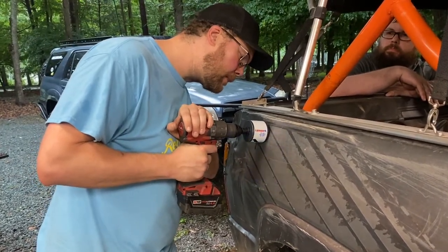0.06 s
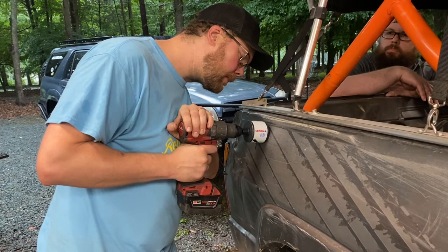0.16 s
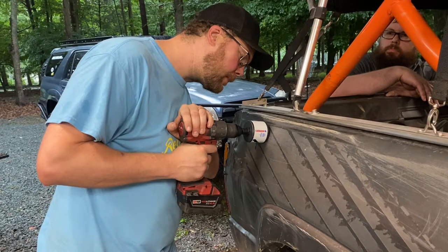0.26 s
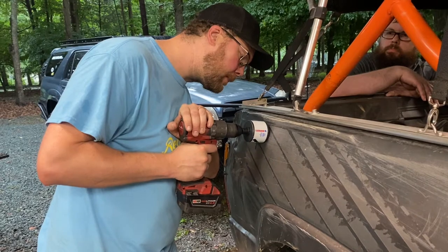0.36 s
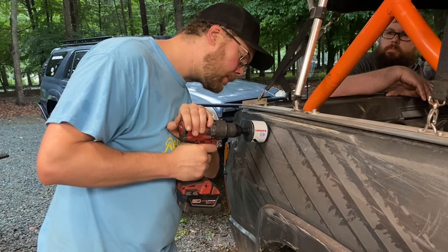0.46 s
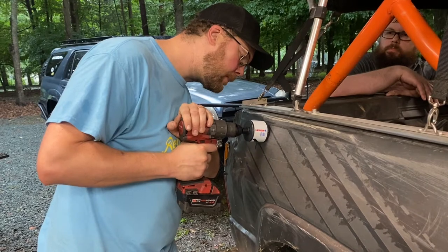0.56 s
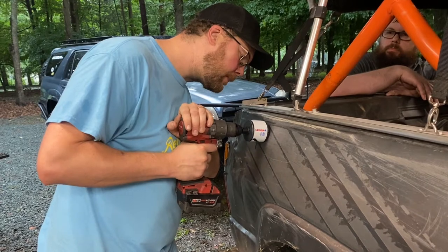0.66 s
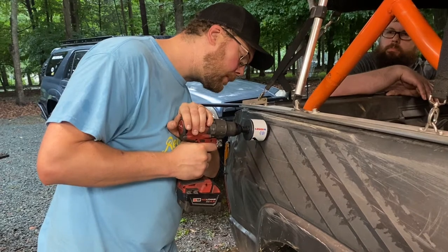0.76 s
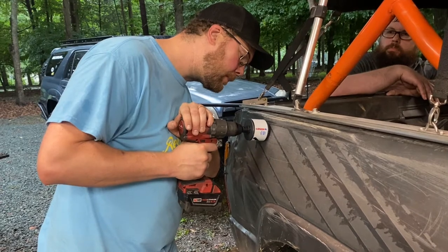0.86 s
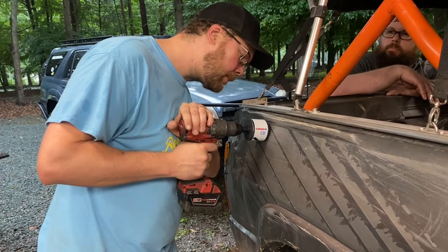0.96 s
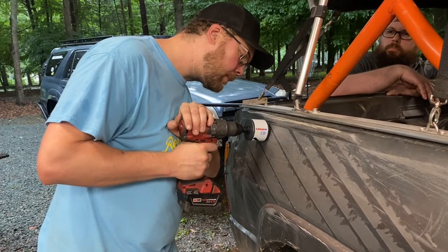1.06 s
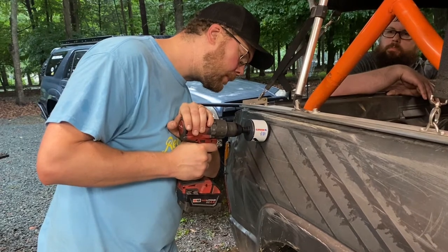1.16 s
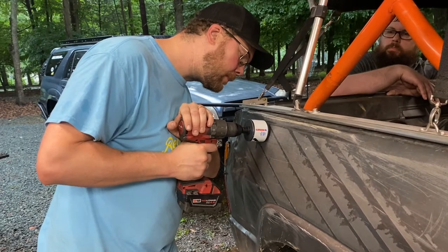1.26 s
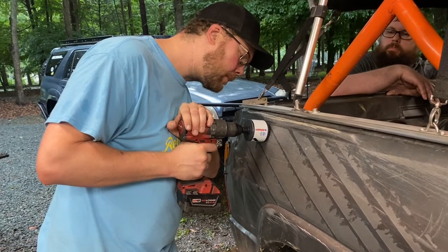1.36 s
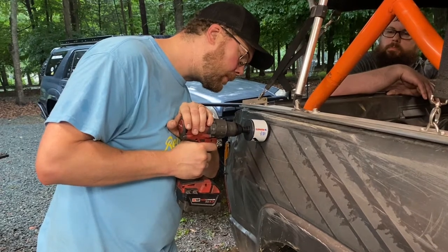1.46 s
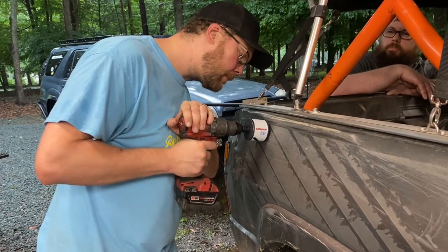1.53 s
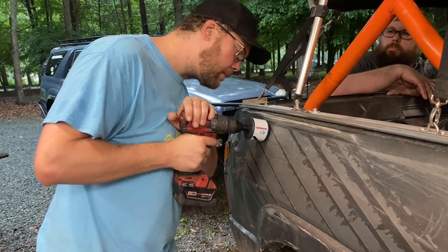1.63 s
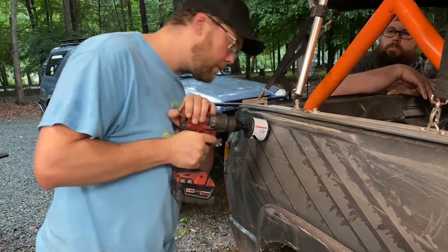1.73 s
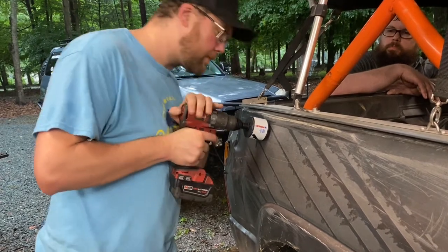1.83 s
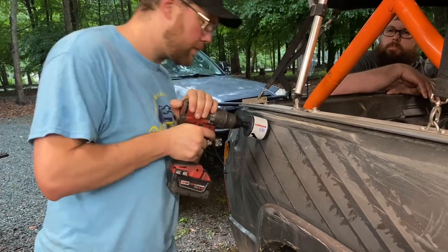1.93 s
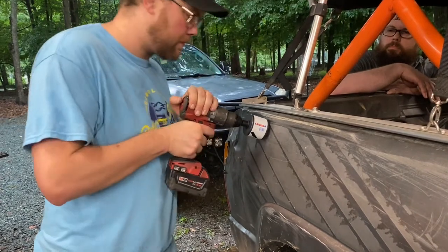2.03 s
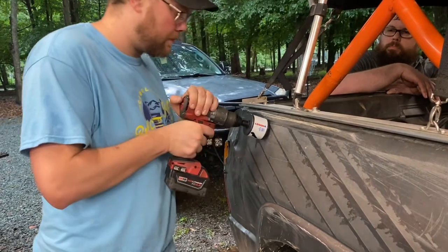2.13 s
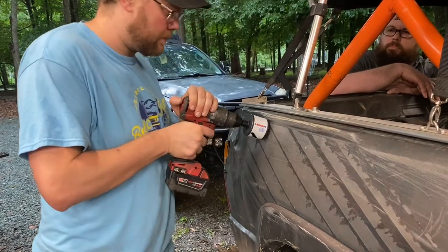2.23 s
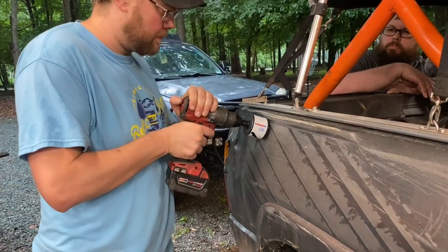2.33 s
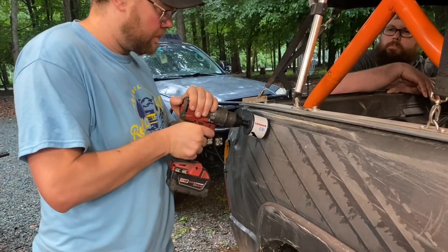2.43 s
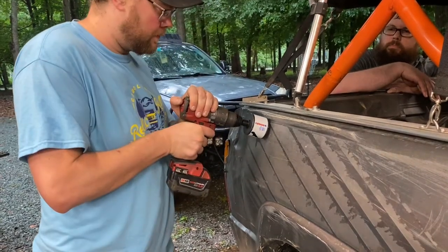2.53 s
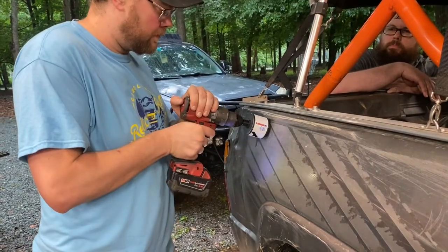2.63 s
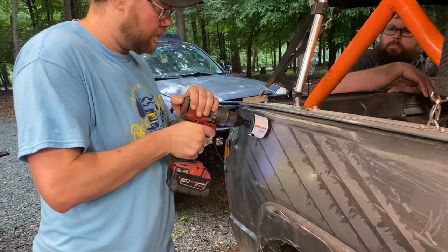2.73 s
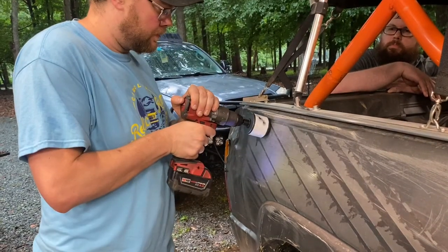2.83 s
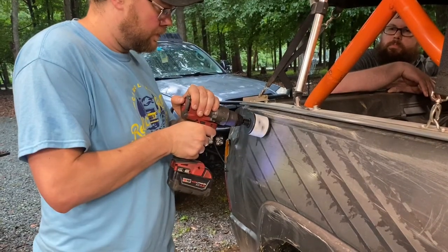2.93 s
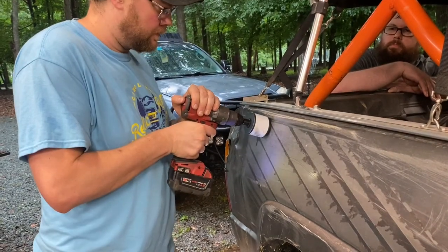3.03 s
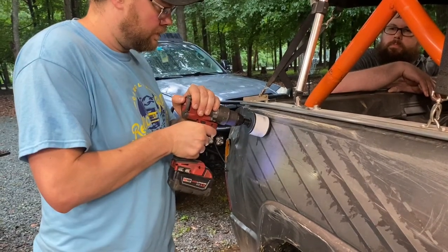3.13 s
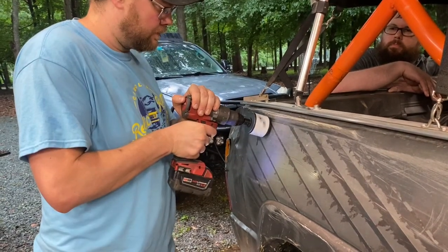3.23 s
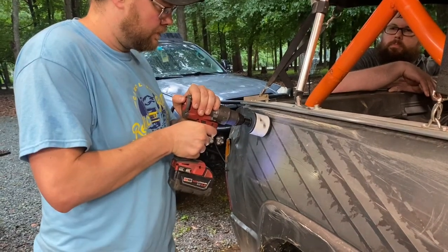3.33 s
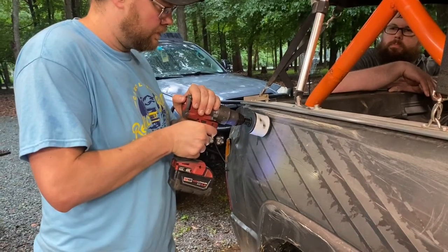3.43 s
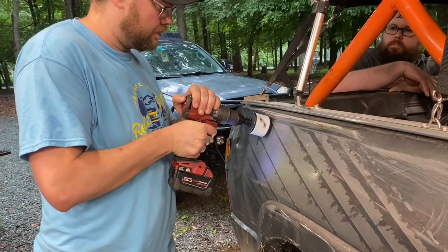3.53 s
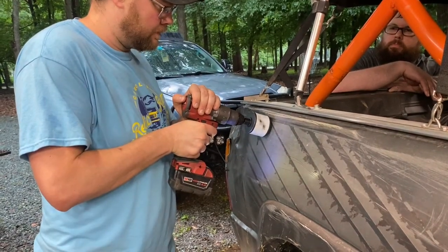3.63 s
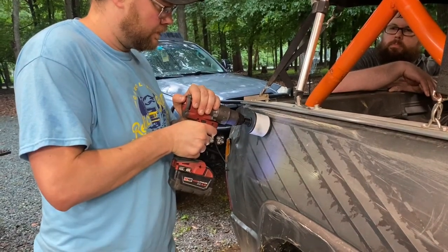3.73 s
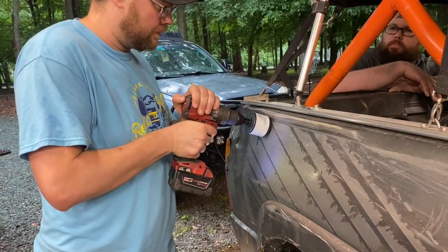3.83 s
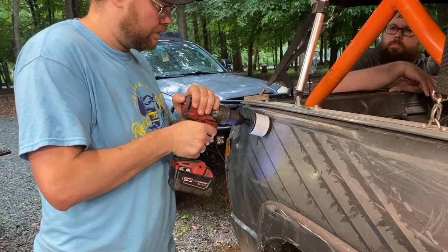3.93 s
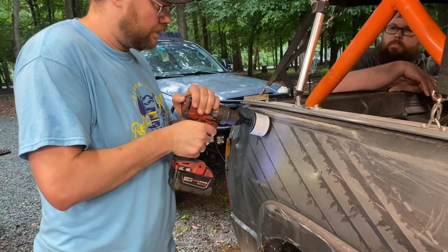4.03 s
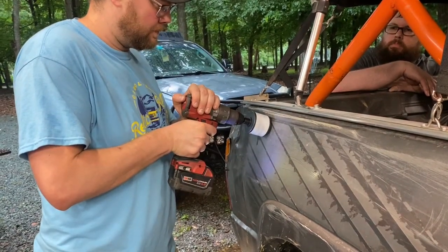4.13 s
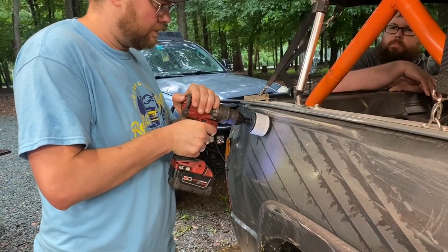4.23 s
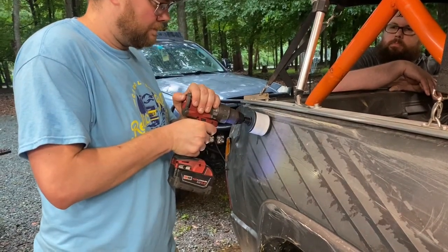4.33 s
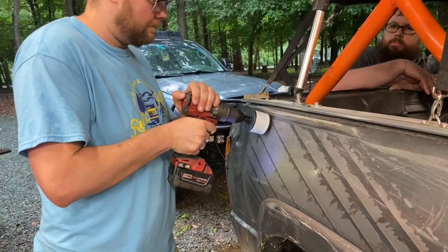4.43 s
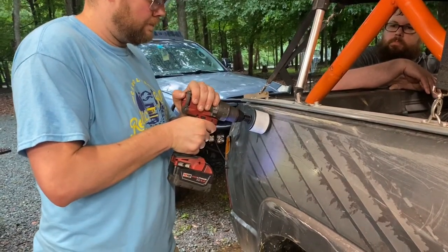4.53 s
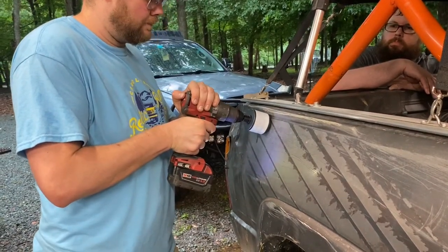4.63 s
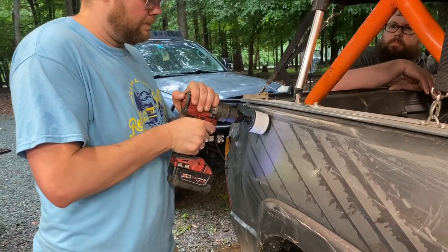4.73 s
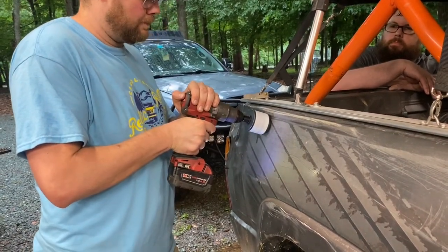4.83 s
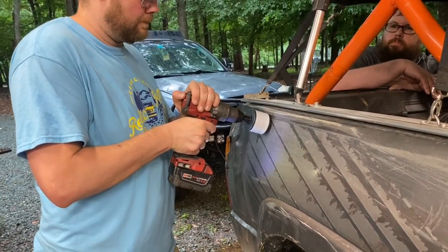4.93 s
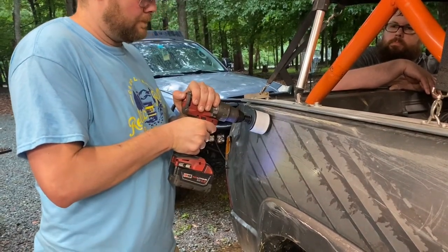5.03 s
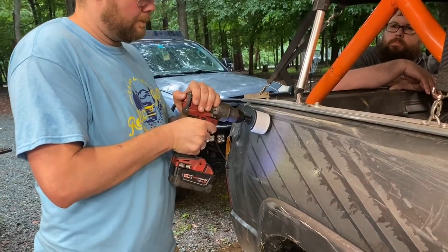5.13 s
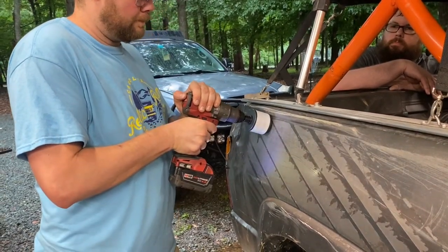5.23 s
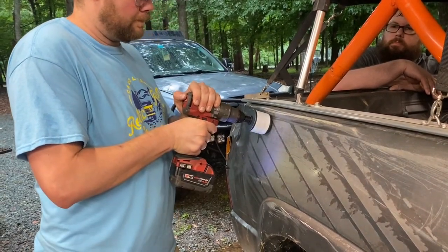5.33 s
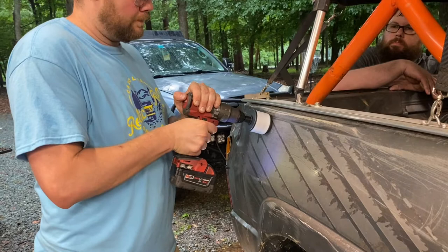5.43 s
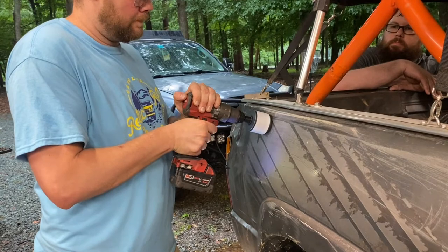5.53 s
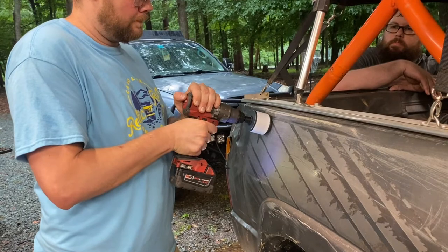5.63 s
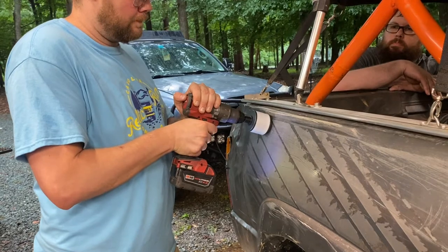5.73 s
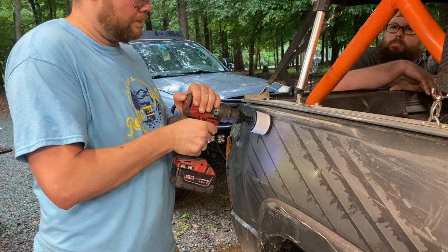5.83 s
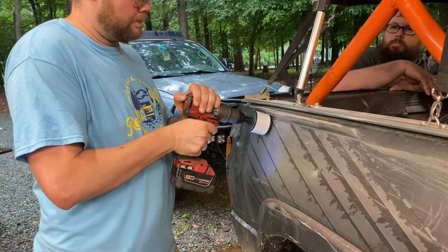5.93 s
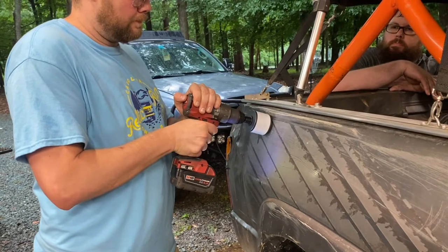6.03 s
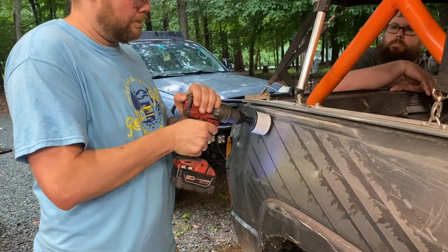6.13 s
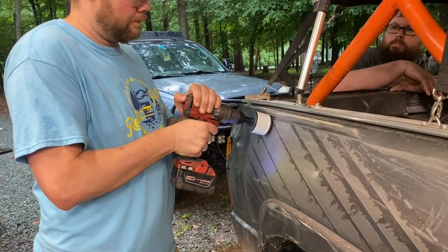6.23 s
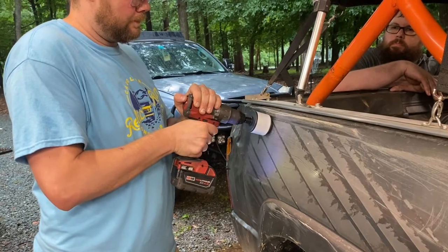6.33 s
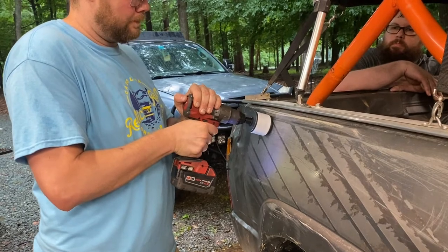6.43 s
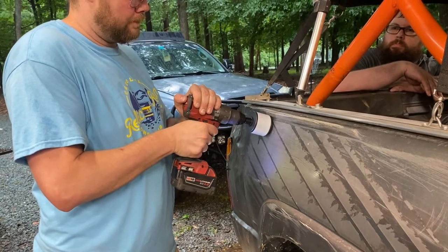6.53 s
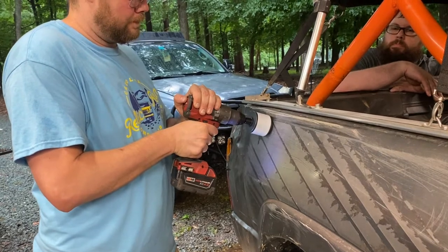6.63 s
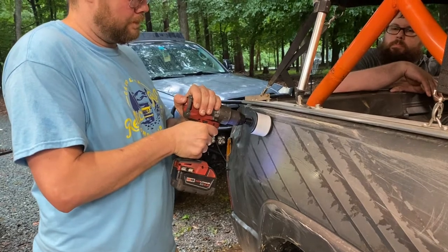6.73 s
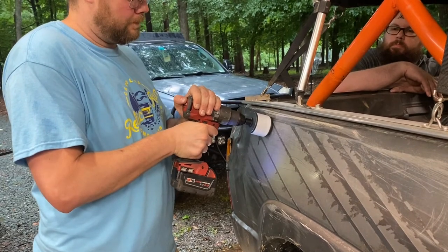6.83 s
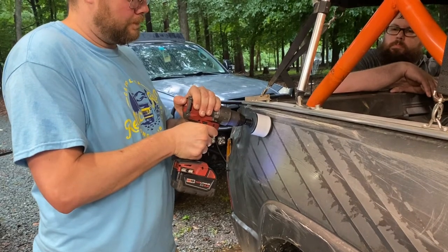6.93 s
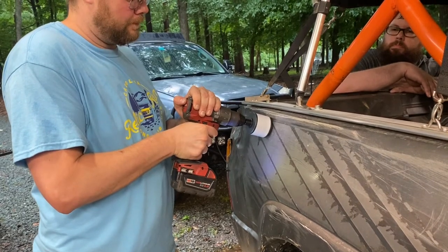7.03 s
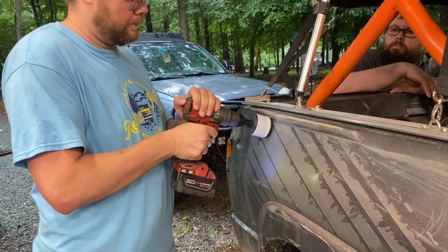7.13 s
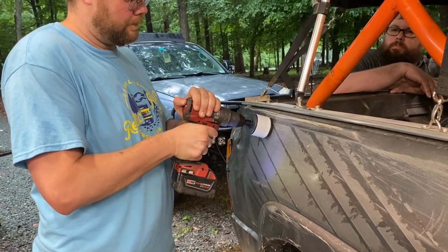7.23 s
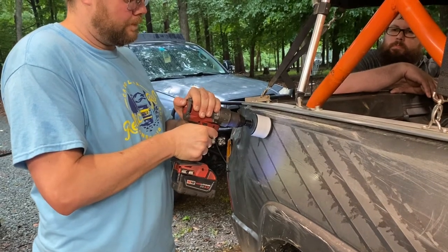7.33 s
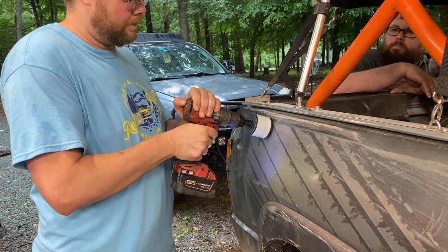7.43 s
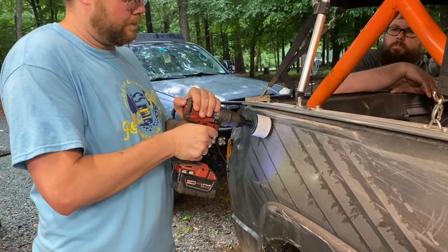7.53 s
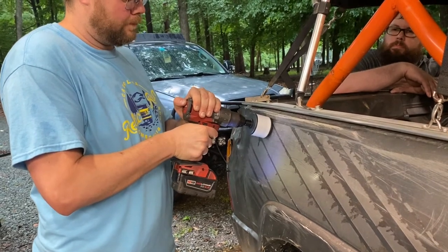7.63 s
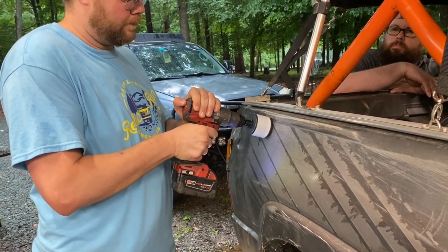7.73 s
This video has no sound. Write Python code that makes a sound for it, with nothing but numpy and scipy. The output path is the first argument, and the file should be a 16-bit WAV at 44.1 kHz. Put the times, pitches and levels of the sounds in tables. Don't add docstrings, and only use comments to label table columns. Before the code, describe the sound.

Outdoors, about a metre from the stereo microphone. From 0 to 2.7 s a nearby engine idles: a low, unsteady throb with soft broadband noise and faint wavering tones. Tiny plastic trigger ticks come around 0.5 to 0.8 s, at 1.5 s and at 2.6 s, when a thin, steady, very high whistle begins. At 2.7 s hole-saw teeth snap against the steel panel, and by 2.85 s they become a rapid loud rattle, squealing briefly, booming and grating. The rate sags near 3.4 s, then climbs steeply from 3.6 to 4.7 s, the clatter fusing into a rising, rasping buzz while the engine sinks beneath it. At full speed the teeth chatter roughly, with gear whine, bright cup pings and rubbing chips. From about 5.7 s the cut steadies into a low buzzing hum, somewhat quieter, with gritty scraping and occasional snags, continuing to the end near 7.8 s.

```python
import sys
import numpy as np
from scipy import signal
from scipy.fft import rfft, irfft, next_fast_len
from scipy.io import wavfile
from scipy.ndimage import uniform_filter1d

SR = 44100
rng = np.random.default_rng(int(sys.argv[2]) if len(sys.argv) > 2 else 0)


def materialize(psi):
    bounded = np.clip(np.atleast_2d(psi).T, -1, 1)
    quanta = np.round(bounded * 32767).astype(np.int16)
    wavfile.write(sys.argv[1], SR, quanta)


def boost_factor(decibels):
    exponent = np.asarray(decibels, float) / 20
    return 10 ** exponent


N = 342657
SIZE = next_fast_len(N + SR)
HZ = np.fft.rfftfreq(SIZE, 1 / SR) + 1e-3
T = np.arange(N) / SR


def on_hz(table):
    f, v = np.transpose(table)
    return np.interp(np.log(HZ), np.log(np.maximum(f, 1)), v)


def modes(table, signs=1):
    signs = np.broadcast_to(signs, len(table))
    total = 0
    for sign, (f, width, db) in zip(signs, table):
        damping = 1j * width * HZ
        total = total + sign * boost_factor(db) * damping / (f * f - HZ ** 2 + damping)
    return total


def band(lo_hz, hi_hz, order=2):
    high_pass = 1j * HZ / lo_hz / (1 + 1j * HZ / lo_hz)
    return (high_pass / (1 + 1j * HZ / hi_hz)) ** order


def causal(gain):
    c = irfft(np.log(gain + 1e-9), SIZE)
    c[1:SIZE // 2] *= 2
    c[SIZE // 2 + 1:] = 0
    return np.exp(rfft(c))


def unit(x):
    return x / np.sqrt(np.mean(np.abs(x) ** 2))


def clicks(times, sizes):
    at = times * SR
    i, part = at.astype(int), at % 1
    early = np.bincount(i, sizes * (1 - part), N + 2)
    late = np.bincount(i + 1, sizes * part, N + 2)
    return (early + late)[:N]


def walk(rate):
    k = int(SR / rate)
    steps = np.repeat(rng.standard_normal(N // k + 1), k)
    return unit(uniform_filter1d(uniform_filter1d(steps, k), k)[:N])


# frequency_hz, lead_rad
PORT_LEAD = [(250, 0), (520, -.5), (780, -.3), (1810, -.2), (2840, .4), (7240, -.1), (8700, -3.0),
             (9560, -3.4), (10400, -6.0), (11600, -6.6), (13000, -9.3), (13700, -9.6), (15100, -12.6)]


def ports(alike, unlike, share, lean_db):
    turn = np.exp(.5j * on_hz(PORT_LEAD)) * boost_factor(lean_db / 2)
    a, b = np.sqrt(1 - share ** 2) * alike, share * unlike
    return np.array([irfft((a + b) * turn, SIZE)[:N], irfft((a - b) / turn, SIZE)[:N]])


# frequency_hz, level_db
IDLE_COLOUR = [(15, -51), (25, -14), (60, -9), (138, -8), (167, -12.5), (304, -11.5), (409, -14.5),
               (444, -13), (552, -16.5), (949, -16.5), (1280, -22), (6010, -38), (9030, -49.5),
               (15100, -56.5), (16400, -70)]
# frequency_hz, width_hz, level_db (not used)
IDLE_MODES = [(73, 360, 0), (417, 2.7, -4), (944, 26, -11)]
# frequency_hz, share (0-1)
IDLE_UNLIKE = [(60, 0.14), (130, 0.32), (290, 0.44), (640, 0.45), (1400, 0.71), (4400, 0.48), (8000, 0.44),
               (15000, 0)]
# frequency_hz, level_db
IDLE_TONES = [(64.6, -41), (129.2, -44), (296.1, -48), (371.4, -51.5), (441.4, -47)]


def engine():
    resonance = np.abs(modes([(f, w, 0) for f, w, _ in IDLE_MODES]))
    colour = boost_factor(on_hz(IDLE_COLOUR)) * (1 + 0.78 * resonance)
    throb = boost_factor(2.6 * walk(9.1))
    low = np.abs(band(53.0, 175.0))
    pair = []
    for _ in range(2):
        throbbing = rfft(rng.standard_normal(N) * throb, SIZE)
        steady = rfft(rng.standard_normal(N), SIZE)
        pair.append((throbbing * low + steady * (1 - low)) * colour)
    noise = ports(pair[0], pair[1], np.clip(on_hz(IDLE_UNLIKE), 0, .95), -0.83)
    drift = np.cumsum(1 + 0.0152 * walk(3)) / SR
    tones = 0
    for hz, db in IDLE_TONES:
        tones = tones + boost_factor(db + 5.5 + 3.75 * walk(12)) * np.sin(2 * np.pi * hz * drift)
    idle_db = -30.5
    return unit(noise) * boost_factor(idle_db + 0.5 * walk(9.1)) + tones


# frequency_hz, level_db
SWITCH = [
    (7815, -52),
    (15630, -69),
]
# start_s, peak_db, pitch_hz
TICKS = [(0.5122, -60, 5390), (0.6679, -51, 7400), (0.7053, -53, 5990), (0.7836, -59, 5380),
         (1.4636, -53, 6460), (2.6174, -52, 7820)]


def trigger():
    switch_on_s, decay_s = 2.606, 0.049
    out = sum(boost_factor(db) * np.sin(2 * np.pi * hz * T) for hz, db in SWITCH) * (T > switch_on_s)
    for start_s, db, hz in TICKS:
        age = np.maximum(T - start_s, 0)
        burst = rng.standard_normal(N) * (T > start_s) * boost_factor(-60 * age / decay_s)
        plastic = modes([(hz, 6000, 0)])
        out = out + boost_factor(db + 11.5) * irfft(rfft(burst, SIZE) * plastic, SIZE)[:N]
    return out


# time_s, tooth_rate_hz
RUN_UP = [(2.852, 98), (2.93, 102), (2.965, 108.5), (3.04, 109.5), (3.11, 107.5), (3.2, 92), (3.452, 77.3),
          (3.6, 85.6), (3.76, 115), (3.918, 149), (4.082, 205.1), (4.24, 237.5), (4.488, 311.8),
          (4.585, 332)]
# time_s, tooth_rate_hz
FULL = [(4.635, 405), (4.74, 448), (4.89, 461), (5.5, 460), (5.95, 455), (7.77, 455)]
CUT_START_S = RUN_UP[0][0]


def tooth_rate():
    return np.interp(T, *np.transpose(RUN_UP + FULL))


# time_s, share of seating (1 = full)
SEATED = [(4.5, .3), (5.45, .3), (5.66, .5), (5.8, .9), (6.5, .8), (7.3, 1.1), (7.77, 1.1)]


def seating(at_s, before=None):
    return np.interp(at_s, *np.transpose(SEATED), left=before)


HUM_EIGHTHS = [3, 3.62, 4, 5, 8, 12, 14]
HUM_DB = [-32.5, -30, -31.5, -49, -37, -40.5, -44]
# multiple of tooth rate, level_db
WHINE = [
    (1, -46.5),
    (2, -39),
]


def partials(table, turns):
    flutter_db = 2.2
    total = 0
    for multiple, db in table:
        level = boost_factor(db + 3.5 + flutter_db * walk(16))
        total = total + level * np.sin(2 * np.pi * multiple * turns)
    return total


def hum():
    speed = tooth_rate()
    turns = np.cumsum(speed) / SR
    seated = seating(T, before=0) ** 2
    skip_s, skip_span_s, skip_db = 4.6, 0.11, -26.5
    skip = np.exp(-((T - skip_s) / skip_span_s) ** 2) * partials([(.5, skip_db)], turns)
    locked = seated * partials(zip(np.divide(HUM_EIGHTHS, 8), HUM_DB), turns)
    gears = np.clip((speed - 440) / 20, 0, 1) * (1.4 - seated) * partials(WHINE, turns)
    return skip + locked + gears


# time_s, feed_db, sharpness_db
FEED = [(2.85, -23, -2), (2.95, -22, -8.5), (3.065, -24.5, -8.5), (3.1, -21.5, -6.5), (3.3, -20, -6.5),
        (3.5, -19.5, -8), (3.65, -18.5, -7.5), (3.899, -15, -7.5), (4.1, -17, -3.5), (4.4, -17.5, -1.5),
        (4.55, -20, -5), (4.9, -21.5, -3), (5.5, -22.5, -2), (6.1, -24, 0.2), (6.5, -26, 0.5),
        (7.3, -25.5, 0), (7.77, -27.5, 3)]
# time_s, length_s, boom_db, ring_db
SNAGS = [(2.955, 0.32, 7, 14.5), (3.028, 0.076, 1.5, 11), (3.463, 0.04, -3, 4), (3.765, 0.042, -13, 2),
         (4.05, 0.055, -6, 1), (4.083, 0.028, 2, 7), (4.268, 0.034, -22, 4), (4.4, 0.066, 4, -0.5),
         (4.56, 0.056, -3, 1), (4.16, 0.033, -13, 0), (5.034, 0.041, 3.5, 4.5), (5.12, .03, -2, -9),
         (4.663, 0.28, -2, -1.5), (5.618, 0.16, 3, -0.5), (4.6, 0.067, -1, 3), (5, 0.13, 1.5, -3),
         (12, .15, 2, 0), (4.1, .15, -2, 3), (6, 1, 4.5, -0.3), (6.194, 0.093, -5, -3),
         (6.283, 0.064, 2.5, 4.5), (6.331, 0.027, -8, -2.5), (6.726, 0.042, 5.5, 1.5),
         (7.264, 0.029, -17, -6), (7.74, 0.15, 4.5, 3)]
# level_db over feed, share of sharpness, full_speed_db, wobble_db,
# share of snag
PARTS = [
    (3.5, 0.05, -5, 1.5, 1),
    (-2, 0.02, 0.5, 1, 0.61),
    (-0.5, 0.38, -1.5, 2.5, 0.17),
    (2, 1.13, -2, -0.3, 0.089),
    (-3, 0.91, 3.5, 1.5, 0.58),
]


def effort(speed, turns):
    s, feed_db, sharp_db = np.transpose(FEED)
    feed, sharp = np.interp(T, s, feed_db), np.interp(T, s, sharp_db)
    fast = np.clip((speed - 318) / 50, 0, 1)
    wobble_teeth, first_peak_tooth = 15, 8.05
    wobble = np.cos(2 * np.pi * (turns - first_peak_tooth) / wobble_teeth) * (1 - fast)
    snag = 0
    for at, span, low_db, high_db in SNAGS:
        snag = snag + np.exp(-(2 * (T - at) / span) ** 2) * np.array([[low_db], [high_db]])
    levels = []
    for k, (db, share, fast_db, wobble_db, part) in enumerate(PARTS):
        level = feed + db + share * sharp + fast_db * fast + wobble_db * wobble
        shake = 1.0 * walk(12)
        levels.append(level + part * snag[min(k, 1)] + shake)
    return levels


def smear(longest_s):
    out = -1
    for lag in longest_s * rng.uniform(0.1997, 1, 3):
        z = np.exp(-2j * np.pi * HZ * lag)
        out = out * (z - .78) / (1 - .78 * z)
    return out


# frequency_hz, share (0-1)
STEEL_UNLIKE = [(60, .07), (150, .1), (300, .34), (700, .52), (1400, .48), (3100, .45), (5000, .47),
                (7000, .25), (15000, .33)]
# frequency_hz, lean_db
PORT_LEAN = [(60, 2.5), (110, -5), (200, 0), (380, -3.5), (700, -0.5), (1290, 0), (2380, 2.5), (4400, 2),
             (8120, 0.5), (15000, -0.5)]


def steel(forces, named, colour, smear_s, crack):
    flips = (-1) ** np.arange(len(named))
    ring = modes(named, flips)
    spectra = []
    for bites, rub in forces:
        wash = colour * smear(smear_s)
        struck = rfft(bites, SIZE) * (ring + crack * wash)
        rubbed = rfft(rub, SIZE) * (.5 * ring + wash)
        spectra.append(struck + rubbed)
    return ports(*spectra, on_hz(STEEL_UNLIKE), on_hz(PORT_LEAN))


# frequency_hz, level_db
STEEL = [(35, -88), (60, -83.5), (199, 13.5), (411, 3.5), (914, -8), (1000, -12), (1210, -8), (2900, -25),
         (4200, -28.5), (5400, -37.5), (6200, -41.5), (7740, -34), (9120, -41), (11300, -42.5),
         (15300, -41.5), (16400, -83)]


def sheet():
    return causal(boost_factor(on_hz(STEEL)))


# frequency_hz, width_hz, level_db
BOOM = [(79.7, 9.3, 2.5), (139.7, 7.3, 6.5), (177, 18.7, 8.5), (219.6, 25.2, 12.5), (222.8, 13.7, 10.5),
        (263.8, 15, 4.5), (329.7, 10.9, 5)]
# frequency_hz, width_hz, level_db
DRONE = [(142, 16, -7), (176.4, 11.5, 3.5), (212.4, 21, 7), (219.2, 14.7, 6.5), (272.4, 14.7, 1.5),
         (325, 12.7, -3)]
# frequency_hz, width_hz, level_db
CLANG = [(404, 30, -4), (490, 17, -9), (530, 49, -7.5), (804, 47, -6), (632, 19, 4.5), (713, 15.6, 7),
         (927, 16, -6.5), (1105, 28, -6), (1216, 22, -12), (1320, 13, -14)]
# frequency_hz, width_hz, level_db
BELLS = [
    [(1237, 42.2, 2), (1248, 20, -0.5)],
    [(1867, 25.5, 3), (1833, 8.8, 0)],
]
# frequency_hz, width_hz, level_db
GRATE = [
    [(1389, 25, -1), (1512, 25, 0), (1590, 22, 0), (1667, 35, 3), (1990, 25, -2), (2123, 22, 6.5),
     (2310, 25, 0), (2448, 30, 2.5), (2585, 30, 2), (2726, 30, -1), (2865, 30, -2), (2995, 32, 0)],
    [(3110, 30, 0), (3170, 25, -1), (3525, 35, 7), (3720, 40, -2), (3930, 35, 6), (4240, 45, 2),
     (4420, 60, -1), (4560, 40, -9), (4860, 28, 9), (4990, 30, 2), (5160, 40, 1), (5320, 40, 1),
     (5490, 45, 0)],
]
# frequency_hz, width_hz, level_db
CUP = [
    [(7600, 200, -3), (7820, 60, 0), (8050, 80, -2)],
    [(11000, 48, 3), (11600, 60, -5), (12400, 500, -11)],
    [(14430, 60, 1), (14620, 70, 0), (15600, 160, -10)],
]
# time_s, low_bell_db, high_bell_db,
# rasp_db
BEARING = [(2.84, -3, 0, 0), (2.87, -1.5, -1, 8.5), (3.062, -2, 7, 10), (3.075, 0, -7, -2.5),
           (3.3, 1, 0, -1), (3.45, 0, 4, -1.5), (3.6, -2, 1, 0), (3.72, -1, -2, -0.5), (3.9, -7, 0.5, -1),
           (4.15, -3, -2.5, -1), (4.45, -11, 2, -2), (4.8, -3, 6, 1.5), (5.0, -11, 8, -2.5),
           (5.3, -3.5, 2.5, 0.5), (5.6, -2, 2.5, -1.5), (6.3, 0, 0, -1.5), (6.9, 0.5, -4, -1.5),
           (7.77, -0.5, -0.5, -2.5)]


def struck_parts(speed, turns):
    boom, clang, grate, rasp, ring = effort(speed, turns)
    bearing_s, *bearing_db = np.transpose(BEARING)
    low_bell, high_bell, edge = (np.interp(T, bearing_s, db) for db in bearing_db)
    return [(boom, BOOM, 60., 320., -15, .005, 1, .15, .8, .02, -2),
            (boom, DRONE, 130., 400., -22, .005, 0, .03, .6, .4, -6),
            (clang, CLANG, 350., 1500., -10, .004, 1, .12, 1.7, .7, -1),
            (clang + low_bell, BELLS[0], 1000., 1500., -25, .004, 1, .3, 1.6, .6, -3.5),
            (grate + high_bell, BELLS[1], 1500., 2200., -25, .002, 1, .8, 2.5, .6, -9),
            (grate, GRATE[0], 1400., 3800., -10, .002, 1, .7, 3.0, .6, -4),
            (rasp + edge, GRATE[1], 3200., 6500., -5, .0005, 1, .45, 3.2, .8, -2),
            (ring, CUP[0], 6500., 9000., -7, .001, 1, .55, 4.5, .5, -6),
            (ring, CUP[1], 9000., 13000., -7, .001, 1, .55, 5.5, .5, -3.5),
            (ring, CUP[2], 13000., 17000., -7, .001, 1, .55, 6.5, .5, -5)]


def chip_rub(first_s, speed, turns):
    onset = np.interp(T, [first_s[0], first_s[1], CUT_START_S], [.2, .4, .7], left=0)
    fade_db = np.interp(speed, [300, 450], [7, 2.5]) * (turns % 1)
    return onset * boost_factor(-fade_db + 1.5 * walk(25))


# start_s, peak_db, boom_db, ring_db
FIRST = [(2.7177, -11, -25, -6), (2.7531, -5, -18, -1), (2.7704, -3, -14, 0), (2.7864, -7, -14, -4),
         (2.8024, -9, -16, -13), (2.8164, -9, -15, -14), (2.8274, -9, -18, -8), (2.8394, -6, -12, -8)]
# start_s, peak_db, low_ring_db, high_ring_db
PINGS = [(2.861, -21, -16, -8), (2.881, -17, -10, -18), (2.922, -14, -13, -12), (3.015, -18, -10, -16),
         (3.041, -20, -10, -15), (3.059, -11, -14, -16), (3.191, -28, -18, -8), (3.2046, -24, -20, -6),
         (3.3204, -27, -11, -7), (3.3824, -21, -29, -15), (3.4455, -22, -10, -19), (3.5357, -26, -19, -17),
         (3.5578, -22, -13, -20), (3.583, -23, -21, -17), (3.617, -28, -19, -10), (3.7394, -23, -16, -10),
         (3.7646, -17, -16, -13), (4.0382, -28, -12, -14), (4.139, -17, -12, -17), (4.3819, -18, -23, -18),
         (4.436, -22, -9, -12), (4.4965, -24, -14, -11), (4.6992, -17.5, -18, -11.5),
         (4.7763, -18, -15, -12.5), (4.836, -15, -24, -15), (4.9771, -19, -23, -13.5),
         (5.0145, -12, -16, -19), (5.048, -24, -14, -14), (5.1161, -16.5, -28, -9.5),
         (5.1572, -19, -26, -11), (5.189, -22, -30, -12), (5.2195, -18, -31, -10.5),
         (5.3958, -20, -16, -8.5), (5.787, -17, -10, -13), (5.8248, -17, -17, -12), (5.8485, -17, -19, -10),
         (5.89, -25, -17, -5), (5.9253, -15, -16, -15), (5.9825, -17, -12, -14), (6.0303, -16, -14, -23),
         (6.2752, -20, -13, -9), (6.4073, -25, -8, -21), (6.4423, -22, -11, -11), (6.7326, -24.5, -7, -11),
         (6.876, -27, -10, -14), (7.097, -14, -20, -14.5), (7.3856, -21, -9.5, -25), (7.527, -17, -14, -14)]
PING_REACH = [-60, -60, -60, -60, -30, -30, -7, 18, 14.5, 0]
TOOTH_SET = [.9, -.7, .5, -.9, .2, -.6, .8, -.3]


def saw():
    speed = tooth_rate()
    cutting = T > CUT_START_S
    turns = np.cumsum(speed * cutting) / SR
    layers = struck_parts(speed, turns)
    first_s, first_db, boom_db, ring_db = np.transpose(FIRST)
    ping_s, ping_db, ping_low, ping_high = np.transpose(PINGS)

    count = np.arange(int(turns[-1]))
    chance = rng.standard_normal((32, len(count)))
    timing, common = chance[:2]
    own_grab, own_skip, own_far = chance[2:12], chance[12:22], chance[22:32]
    wander = np.interp(np.interp(count, turns, speed), [310, 400], [.024, .085])
    t = np.interp(count + wander * timing, turns, T, left=CUT_START_S)
    hz = np.interp(t, T, speed)
    chatter = np.clip((hz - 330) / 40, 0, 1)
    unevenness = np.clip((hz - 305) / 40, 0, 1)
    tooth = seating(t) * np.take(TOOTH_SET, count % 8)
    rub = chip_rub(first_s, speed, turns)
    panel = sheet()

    # share of tooth set, rub_db, first_bites_db, sense of the push, broad crack in a bite
    contact = [(0.041, -27.5, -3.5, 0.79, 0.4), (0.85, -35, -52, 0.98, 1.3),
               (1.0, -17.5, -10.0, -0.7, 2.2), (1.0, -13, -9, -1.19, 0.99),
               (0.22, -13.0, -15, -0.77, 1.5), (0.47, -13.5, -11.0, -1.066, 0.8),
               (.4, -15.5, -16, -1, 1.9), (.3, -24, -14, -1, .35),
               (.3, -24, -8, -1, .5), (.3, -24, -11, -1, .5)]
    out = 0
    for k, layer in enumerate(layers):
        db, named, lo, hi, dense_db, smear_s, slow, fast, scatter_db, skip, trim_db = layer
        set_share, rub_db, start_db, sense, crack = contact[k]
        grab = boost_factor(scatter_db * np.minimum(common * .3 + own_grab[k] * .9, 2.7))
        uneven = set_share * tooth + skip * np.diff(own_skip[k], prepend=0)
        bite = grab * (slow + (fast - slow) * chatter) + unevenness * uneven
        size = boost_factor(np.interp(t, T, db)) * bite / np.sqrt(hz / 200)

        first_own = boom_db if k < 2 else first_db if k < 7 else ring_db
        start = boost_factor(first_own - first_own.max() + start_db)
        ping_ring = ping_low if k < 8 else ping_high
        hard = boost_factor(ping_db + ping_ring + PING_REACH[k])

        level = boost_factor(db)
        times = np.r_[first_s, ping_s, t]
        forces = []
        for far in (1, own_far[k]):
            bites = clicks(times, np.r_[start, hard, size * far])
            rubbing = rub * rng.standard_normal(N) * level * boost_factor(rub_db)
            forces.append((bites, rubbing))

        colour = panel * band(lo, hi, order=3)
        dense = boost_factor(dense_db) * colour / np.abs(colour).max()
        sound = steel(forces, named, dense, smear_s, crack)
        balance = np.sqrt(np.mean(level[cutting] ** 2) / np.mean(sound[:, cutting] ** 2))
        out = out + sense * boost_factor(trim_db) * sound * balance
    return out


def scene():
    duck_db = np.interp(T, [2.72, 2.95, 4.1, 5.6], [0, -6, -8, -11.5])
    return saw() + hum() + (engine() + trigger()) * boost_factor(duck_db)


def top_cut(x):
    return signal.sosfilt(signal.butter(12, 16690, fs=SR, output="sos"), x)


# start_s, end_s
WHOLE = [(2.715, 2.86), (3.19, 3.225), (3.26, 3.29), (3.35, 3.38), (3.42, 3.45), (3.51, 3.58), (5.38, 5.41)]
# low_hz, high_hz
MISSING = [(8950, 9350), (13250, 13750)]
# low_hz, high_hz, share of time lost
RIMS = [(8650, 8950, .45), (9350, 9700, .55), (12900, 13250, .15)]


def record(dry):
    cut = signal.sosfilt(signal.butter(5, 50, "high", fs=SR, output="sos"), dry)
    left, right = np.tanh(cut)
    top_hz = 15950

    def part(v, keep):
        return irfft(rfft(v, SIZE) * keep * (HZ < top_hz), SIZE)[:N] / 2

    mid, side = part(left + right, 0.98), part(left - right, 1)
    lost = 1 - sum((T > a) * (T < b) * 1. for a, b in WHOLE)
    for lo, hi, share in [(*b, 1) for b in MISSING] + RIMS:
        frames = np.repeat(rng.random(N // 2048 + 1) < share, 2048)[:N]
        missing_part = part(left + right, (HZ > lo) & (HZ <= hi))
        mid = mid - missing_part * uniform_filter1d(lost * frames, size=400)
    return top_cut(np.array([mid + side, mid - side]))


dry = scene()
out = record(dry)
materialize(out)
```